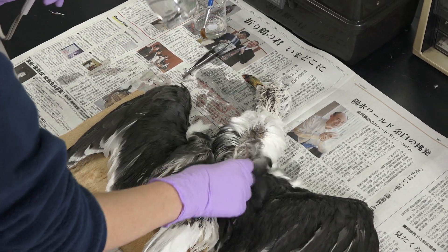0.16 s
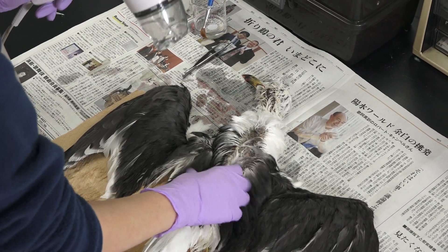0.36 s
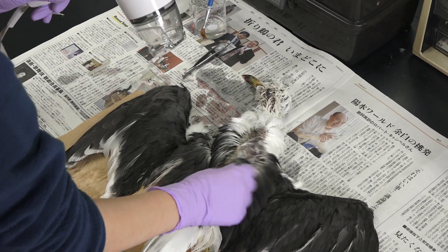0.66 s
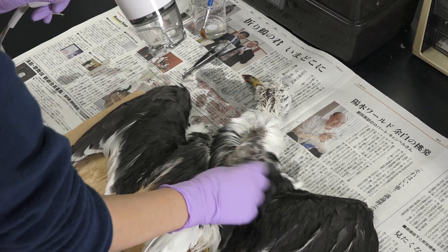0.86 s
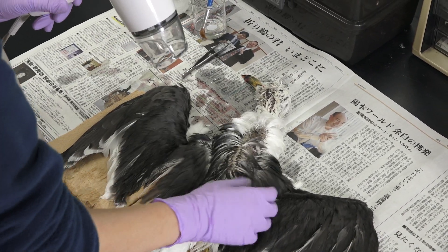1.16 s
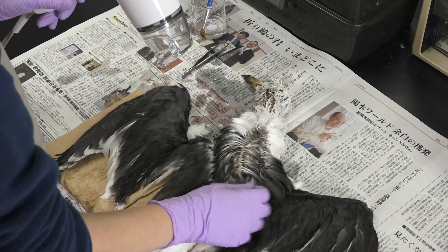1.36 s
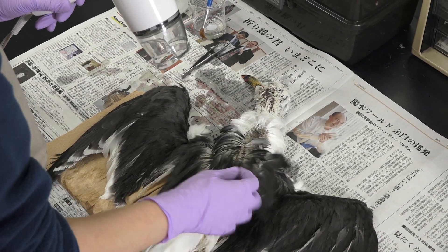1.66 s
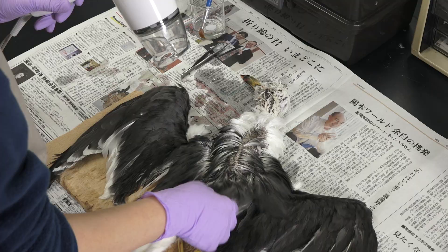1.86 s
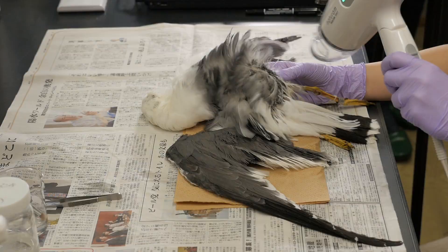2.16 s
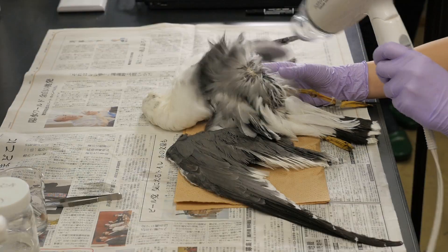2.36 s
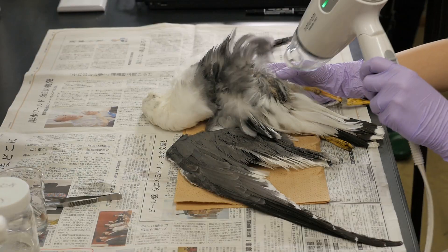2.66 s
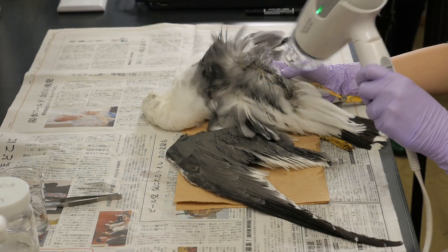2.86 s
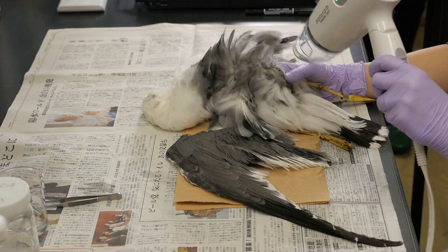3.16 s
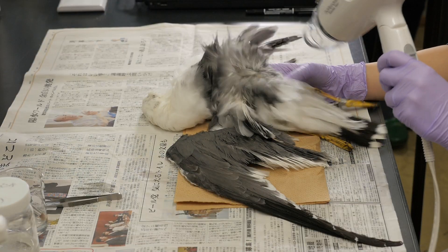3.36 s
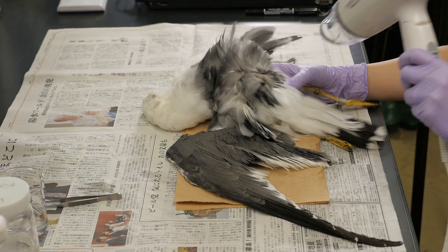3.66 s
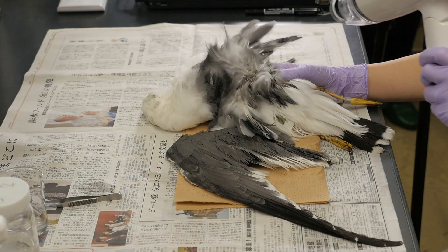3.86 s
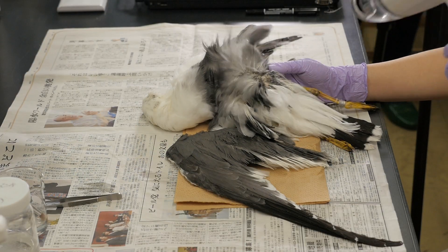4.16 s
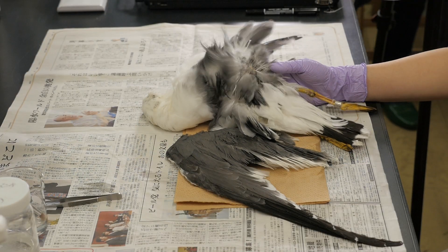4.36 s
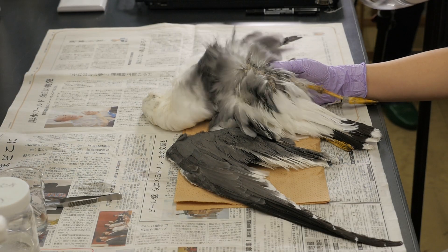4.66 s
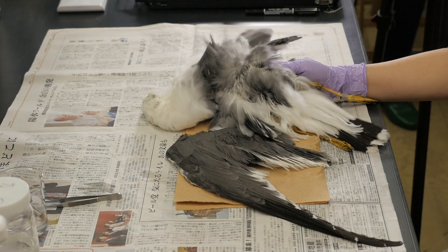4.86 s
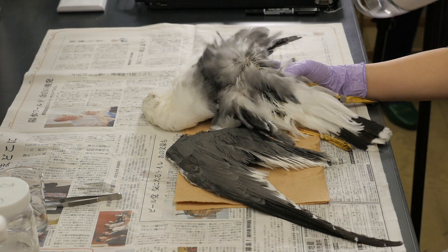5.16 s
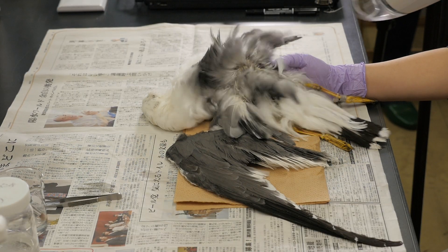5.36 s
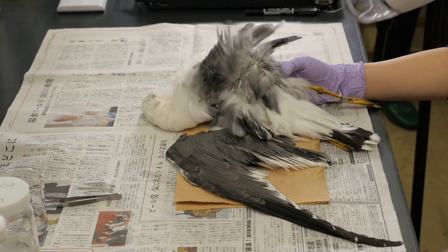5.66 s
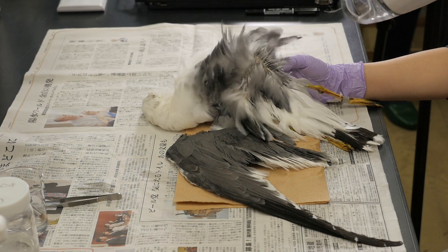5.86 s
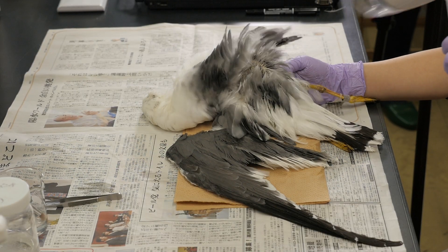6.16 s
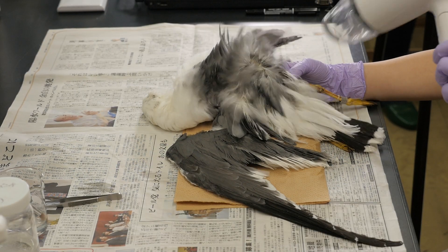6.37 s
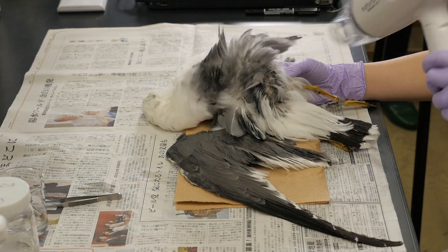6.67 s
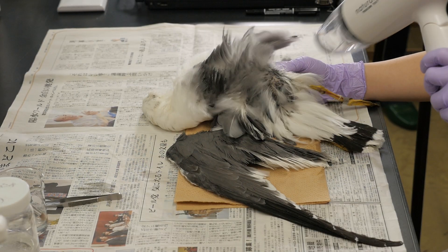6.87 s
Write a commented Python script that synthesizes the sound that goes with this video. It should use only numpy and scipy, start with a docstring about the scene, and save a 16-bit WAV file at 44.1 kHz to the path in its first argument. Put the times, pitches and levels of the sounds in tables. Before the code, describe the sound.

A hand dryer blows over a bird's feathers on a newspaper-covered bench in a quiet room. First a strong pulsing mid-range whine dominates muffled air; at an abrupt cut it sinks into a clearer, broad rush of air whose tone shifts subtly as the dryer is drawn back. Light dry clicks arrive in the last second. Close pickup, faint room hum.

```python
"""A hand-held hair dryer blows over a bird's feathers on a newspaper-covered bench.
Shaped noise makes its rush and hiss, a fluttering narrow tone its howl, multiples of the shaft rate its motor.
At first the howl stands over dull air; at a cut the viewpoint jumps and a brighter rush remains.
The dryer is swayed, drawn back and brought a little nearer again. The room hums on faint steady tones.
Five small handling ticks, made of two fading noises each, come near the end."""
import sys
import numpy as np
from scipy import signal
from scipy.fft import rfft, irfft
from scipy.io import wavfile

SR = 44100
rng = np.random.default_rng(int(sys.argv[2]) if len(sys.argv) > 2 else 0)


def pcm_store(signal):
    """Save signal as 16-bit PCM."""
    levels = np.round(np.clip(np.atleast_2d(signal), -1, 1) * 32767)
    wavfile.write(sys.argv[1], SR, levels.astype(np.int16).T)


N = 309582  # length in samples, about 7 s

CUT_S = 2.197  # the viewpoint jumps here

# How far the dryer is drawn back from the feathers: t/s, distance (0 near to 1 back)
DRAWN_BACK = [(2.2, 0.18), (3.55, 0.01), (3.9, 1), (6.2, 0.97), (6.7, 0.6), (7.02, 0.73)]
# Broad colour of the air rush before and after the cut: f/Hz, relative level/dB
AIR_COLOUR_FIRST = [(30, -30), (70, -20), (130, -7.5), (350, -5), (510, -6), (620, 3), (950, 3), (1230, 5),
                    (1450, -2.5), (1900, -3.5), (3000, -4), (3600, -5.5)]
AIR_COLOUR_SECOND = [(30, -35), (80, -28), (160, -21.5), (250, -16), (430, -12), (520, -13), (620, -0.5),
                     (720, -4.5), (970, -1.5), (1170, -6.5), (1350, 0), (1480, -1.5), (2300, 0.5),
                     (3100, 0), (3600, -5)]
# Colour of the nozzle hiss before and after the cut: f/Hz, relative level/dB
HISS_COLOUR_FIRST = [(3500, -1.5), (4900, -3.5), (5400, -6), (6800, -9), (7500, -12.5), (9000, -16),
                     (11500, -24), (15500, -28.5)]
HISS_COLOUR_SECOND = [(3500, 0), (4800, 2), (5100, -1), (5400, 0.5), (6500, 1.5), (8000, -4.5),
                      (9000, -8.5), (10500, -13), (12200, -16.5), (13700, -19), (14000, -18.5),
                      (15500, -25)]
# Resonances of housing and nozzle gap that lift the rush: f/Hz, width/Hz, lift/dB
DUCT_FIRST = [(768, 82, 6.5), (854, 55, 2), (881, 135, 6), (1664, 59, 5), (1935, 85, 7.5), (2420, 120, 1)]
DUCT_NEAR = [(782, 41, 13.7), (821.5, 24, 9.2), (868, 67, 11.8), (1735, 22, 7.2), (1887, 61, 5.1),
             (2140, 220, 4.4), (2420, 150, 2.7), (2780, 88, 1.5), (3003, 75, 4.8)]
DUCT_BACK = [(780, 37.4, 12.4), (805.7, 18.7, 8.8), (948, 140, 2.2), (1627, 32, 9.6), (1722, 70, 7.7),
             (1933, 127, 5.5), (2500, 93, 4.3), (2944, 47, 6.8), (3180, 11, 3.2)]
# Motor and fan tones before and after the cut: multiple of the shaft rate, level/dB
MOTOR_TONES_FIRST = [(2, -59), (4, -59), (10, -49), (16, -51.5), (17, -52.5), (18, -47.5), (20, -50.5),
                     (23, -53), (26, -56.5), (28, -56.5), (42, -75), (48, -60), (80, -71), (120, -82)]
MOTOR_TONES_SECOND = [(10, -56.5), (30, -52.5), (40, -58), (114, -74), (146, -80)]
# Mains and ventilation hum: f/Hz, level before the cut/dB, level after it/dB
HUM_TONES = [(49.7, -61, -74), (83.3, -70, -71.5), (100.3, -75, -77.5), (248, -61, -75.5),
             (264.6, -60.5, -72), (131.3, -74, -80), (354, -63, -87)]
# Handling ticks: t/s, ring starting level/dB, time for the ring to fall 60 dB/s, crack starting level/dB
TICKS = [(6.2167, -31, .02, -30), (6.3785, -28, 0.047, -32), (6.5338, -27.5, 0.051, -27),
         (6.7024, -27, .02, -30), (6.8732, -24.5, 0.097, -30)]
# Colour of a tick's darker ring: f/Hz, relative level/dB
RING_COLOUR = [(300, -22), (900, -7), (1300, 2), (2100, 3), (3000, 2), (4200, -8), (8000, -23),
               (15000, -38)]
# Colour of a tick's sharp first contact: f/Hz, relative level/dB
CRACK_COLOUR = [(1000, -9), (3000, 4), (7000, -4), (11000, -15), (15500, -34)]
# Level of the thin high whine after the cut: t/s, level/dB
WHINE_LEVEL = [(2.2, -88), (3.12, -69), (3.5, -88), (3.95, -70), (5.5, -67), (7.02, -80)]
# Level of the howl after the cut: t/s, level/dB
HOWL_LEVEL_SECOND = [(2.2, -47), (2.4, -42.5), (2.5, -47), (2.7, -45.5), (3.1, -41), (3.55, -40),
                     (3.8, -44.5), (3.95, -36.5), (4.11, -34), (4.2, -46), (4.6, -41), (5.3, -43),
                     (5.56, -41), (6.5, -44.5), (7.02, -38)]

# Air before and after the cut; the rush level counts only its part above 1 kHz
RUSH_FIRST_DB, HISS_FIRST_DB = -38.1, -45
RUSH_SECOND_DB, HISS_SECOND_DB = -36, -41  # once swelled to full strength
BACK_DB = -0.13  # change of the rush with the dryer drawn back
SWELL_DB, SWELL_S = 4, 0.59  # air, motor and drone start this much weaker at the cut, then rise

HOWL_FIRST_HZ, HOWL_SECOND_HZ = 835, 862  # the duct's note
HOWL_FIRST_DB = -32  # mean level before the cut
# Regular dips in level: time of one crest/s, period/s, depth/dB
THROB = (0.522, 0.1528, 6.4)  # the first howl throbs
ROCK_FIRST = (0.55, 0.83, 8.2)  # the hand rocks the dryer and the drone follows
ROCK_SECOND = (3.21, 1.27, 10)

SHAFT_FIRST_HZ, SHAFT_SECOND_HZ = 99.27, 100.2
DRONE_FIRST_DB, DRONE_SECOND_DB = -56, -62  # unbalance drone at a crest, before swell and fade
DRONE_FADE_DB_PER_S = 2.5  # only after the cut
WHINE_HZ, WHINE_SAG_HZ_PER_S = 13690, 20  # pitch at the cut, and how fast it sags
TOP_HZ = 15650  # hardly any sound is left above this


def undb(db):
    """Turn decibels into a gain."""
    return 10 ** (np.asarray(db) / 20)


def unit(x):
    """Scale a sound to rms 1."""
    return x / np.sqrt(np.mean(x ** 2))


def seconds():
    """Time of every sample, in seconds."""
    return np.arange(N) / SR


def since_cut():
    """Seconds since the cut; zero before it."""
    return np.maximum(seconds() - CUT_S, 0)


def curve(table):
    """Join the points of a (time, value) table by straight lines."""
    times, values = np.transpose(table)
    return np.interp(seconds(), times, values)


def bins():
    """Frequencies of the spectrum, in Hz."""
    return np.maximum(np.arange(N // 2 + 1) * SR / N, 1)


def colour(points, resonances=()):
    """Gain per frequency: a broad slope with resonant humps on it."""
    hz, db = np.transpose(points)
    total_db = np.interp(np.log(bins()), np.log(hz), db)
    for centre, width, lift in resonances:
        total_db = total_db + lift * np.exp(-2 * ((bins() - centre) / width) ** 2)
    return undb(total_db)


def noise(gain):
    """Random noise of the given colour, rms 1."""
    spectrum = rfft(rng.standard_normal(N))
    return unit(irfft(spectrum * gain, N))


def walk(rate):
    """Slow random drift of rms 1, changing about rate times a second."""
    return noise(np.exp(-(bins() / rate) ** 2))


def flutter(rate):
    """Random strength and phase, as eddies give to a tone they carry."""
    return (walk(rate) + 1j * walk(rate)) / np.sqrt(2)


def turn(hz):
    """A rotating complex number whose real part is a tone of moving pitch."""
    return np.exp(2j * np.pi * np.cumsum(hz) / SR)


def sine(hz, db):
    """A plain tone at the given rms level."""
    return np.sqrt(2) * undb(db) * np.real(turn(hz * np.ones(N)))


def rocking(peak_s, period_s, depth_db):
    """A regular dip in dB: nothing at each crest, deepest midway between two."""
    return -depth_db * np.sin(np.pi * (seconds() - peak_s) / period_s) ** 2


def highpass(x, order, hz):
    """Remove what lies below hz."""
    return signal.sosfilt(signal.butter(order, hz, "highpass", fs=SR, output="sos"), x)


def rush(air, duct, eddy_db):
    """Low and middle air noise shaped by the housing; its part above 1 kHz starts at rms 1."""
    gain = colour(air, duct) / np.sqrt(1 + (bins() / 3500) ** 40)  # steep end at 3.5 kHz
    upper_share = np.sqrt(np.sum(gain[bins() > 1000] ** 2) / np.sum(gain ** 2))
    eddies = undb(eddy_db * walk(19))
    return noise(gain) / upper_share * eddies


def hiss(points, eddy_db):
    """Jet hiss from the nozzle, above the housing's resonances; eddies make it flicker."""
    gain = colour(points) / np.sqrt(1 + (3500 / bins()) ** 40)  # steep start at 3.5 kHz
    eddies = undb(eddy_db * walk(16))
    return noise(gain) * eddies


def reflect(x, echo_db, sway_s, count=8):
    """Weak echoes off bench and walls comb the treble; the comb shifts as the hand sways."""
    treble = highpass(x, 2, 1500)
    lags = rng.uniform(.002, .016, count) * SR
    leans = rng.standard_normal(count)  # how much each path follows the sway
    sway = sway_s * SR * walk(0.71)
    samples = np.arange(N)
    echoes = np.zeros(N)
    for lag, lean in zip(lags, leans):
        echoes += np.interp(samples - lag - sway * lean, samples, treble, left=0)
    return x + undb(echo_db) * echoes


def howl(hz, line_width, steadiness, skirt_width, skirt_db):
    """Flow drives a narrow duct resonance; it partly saturates and eddies blur its edges. Rms 1."""
    ring = flutter(line_width)
    # saturation evens out the strength
    ring = ring / (np.abs(ring) + 0.1) ** np.clip(steadiness, 0, 1)
    blurred = ring / np.std(ring) + undb(skirt_db) * flutter(skirt_width)
    return unit(np.real(blurred * turn(np.full(N, hz))))


def motor(shaft_hz, tones, wander, blur):
    """Multiples of a slightly unsteady shaft rate, each fluttering in the air stream."""
    shaft = turn(shaft_hz * (1 + wander * walk(3.94)))
    out = np.zeros(N)
    for multiple, db in tones:
        start_phase = np.exp(2j * np.pi * rng.random())
        tone = shaft ** round(multiple) * start_phase
        out += undb(db) * unit(np.real(tone * (1 + blur * flutter(13.3))))
    return out


def drone_first():
    """Unbalance at the shaft rate gives a low tone that the rocking hand makes rise and fall."""
    return sine(SHAFT_FIRST_HZ, DRONE_FIRST_DB + rocking(*ROCK_FIRST))


def dryer_first():
    """The howling side: strong throbbing duct tone, clear motor tones, dull air."""
    air = undb(RUSH_FIRST_DB) * rush(AIR_COLOUR_FIRST, DUCT_FIRST, eddy_db=0.5)
    jet = undb(HISS_FIRST_DB) * hiss(HISS_COLOUR_FIRST, eddy_db=0.46)
    blown_air = reflect(air + jet, echo_db=-21.5, sway_s=0.00003)
    throb = unit(undb(rocking(*THROB)))
    duct_tone = howl(HOWL_FIRST_HZ, line_width=10.5, steadiness=1.0, skirt_width=32, skirt_db=-9.5)
    duct_tone = undb(HOWL_FIRST_DB) * throb * duct_tone
    motor_tones = motor(SHAFT_FIRST_HZ, MOTOR_TONES_FIRST, wander=0.00122, blur=0.68)
    return blown_air + duct_tone + drone_first() + motor_tones


def room_hum(after):
    """Steady low tones of mains and ventilation, with new levels after the cut."""
    hum = np.zeros(N)
    for hz, before_db, after_db in HUM_TONES:
        level_db = before_db + (after_db - before_db) * after
        wave = np.sin(2 * np.pi * (hz * seconds() + rng.random()))
        hum += np.sqrt(2) * undb(level_db) * wave
    return hum


def drone_second():
    """The unbalance drone at twice the shaft rate, rocked by the hand and slowly fading."""
    fade_db = DRONE_FADE_DB_PER_S * since_cut()
    return sine(2 * SHAFT_SECOND_HZ, DRONE_SECOND_DB + rocking(*ROCK_SECOND) - fade_db)


def high_whine():
    """A faint, thin, fluttering tone at the very top whose pitch slowly sags."""
    pitch = WHINE_HZ - WHINE_SAG_HZ_PER_S * since_cut()
    tone = unit(np.real(flutter(16) * turn(pitch)))
    return undb(curve(WHINE_LEVEL)) * tone


def dryer_second():
    """The rushing side: air swells up; its resonances shift as the nozzle leaves the feathers."""
    back = np.clip(curve(DRAWN_BACK), 0, 1)
    near = np.sqrt(1 - back) * rush(AIR_COLOUR_SECOND, DUCT_NEAR, eddy_db=0.5)
    far = np.sqrt(back) * undb(BACK_DB) * rush(AIR_COLOUR_SECOND, DUCT_BACK, eddy_db=0.5)
    air = undb(RUSH_SECOND_DB) * (near + far)
    jet = undb(HISS_SECOND_DB) * hiss(HISS_COLOUR_SECOND, eddy_db=0.48)
    blown_air = reflect(air + jet, echo_db=-18.5, sway_s=0.00004)
    duct_tone = howl(HOWL_SECOND_HZ, line_width=11.6, steadiness=0.2, skirt_width=15.5, skirt_db=-6.5)
    duct_tone = undb(curve(HOWL_LEVEL_SECOND)) * duct_tone
    motor_tones = motor(SHAFT_SECOND_HZ, MOTOR_TONES_SECOND, wander=0.002, blur=0.49)
    swell = undb(-SWELL_DB * np.maximum(1 - since_cut() / SWELL_S, 0))
    return swell * (blown_air + motor_tones + drone_second()) + duct_tone + high_whine()


def ticks(crack_s):
    """Light handling knocks: a sharp crack and a darker ring, both dying away evenly in dB."""
    ring, crack = np.zeros(N), np.zeros(N)
    for start_s, ring_db, ring_s, crack_db in TICKS:
        start = int(start_s * SR)
        fall_db = -60 * np.arange(N - start) / SR  # divided by the time to fall 60 dB
        ring[start:] += undb(ring_db + fall_db / ring_s)
        crack[start:] += undb(crack_db + fall_db / crack_s)
    knocks = ring * noise(colour(RING_COLOUR)) + crack * noise(colour(CRACK_COLOUR))
    return highpass(knocks, 4, 800)  # small light things radiate no bass


def scene():
    """The two viewpoints joined at the cut, the same in both channels."""
    after = np.clip((seconds() - CUT_S) / 0.012 + 0.5, 0, 1)  # 12 ms crossover
    dryer = np.sqrt(1 - after) * dryer_first() + np.sqrt(after) * dryer_second()
    mono = dryer + room_hum(after) + ticks(crack_s=0.0063)
    return np.array([mono, mono])


def record(dry):
    """The recorder cuts the top steeply."""
    return signal.sosfilt(signal.ellip(12, 0.1, 80, TOP_HZ, fs=SR, output="sos"), dry)


dry = scene()
out = record(dry)
pcm_store(out)
```